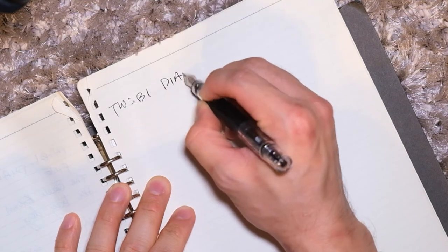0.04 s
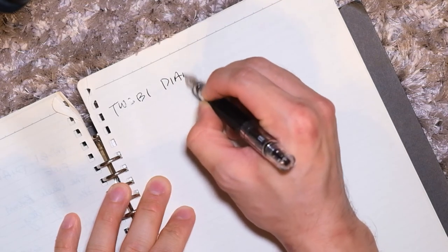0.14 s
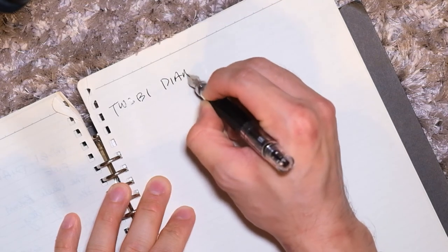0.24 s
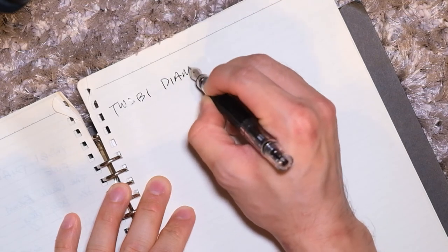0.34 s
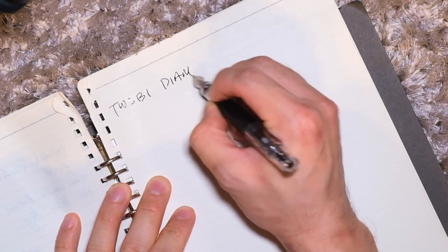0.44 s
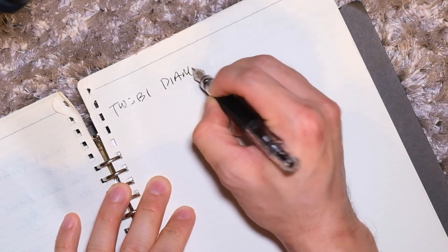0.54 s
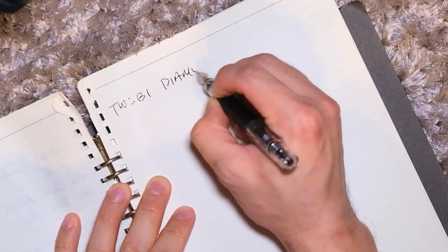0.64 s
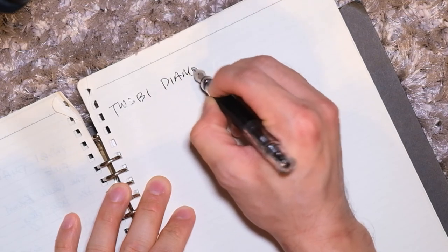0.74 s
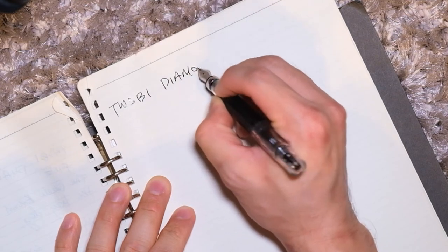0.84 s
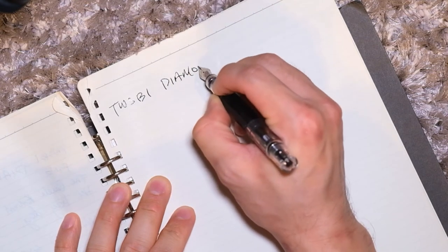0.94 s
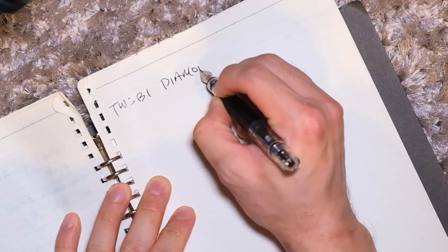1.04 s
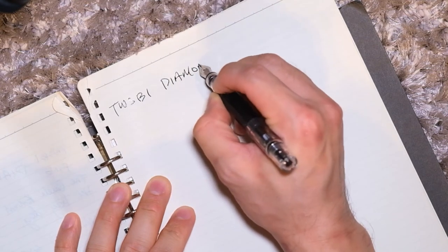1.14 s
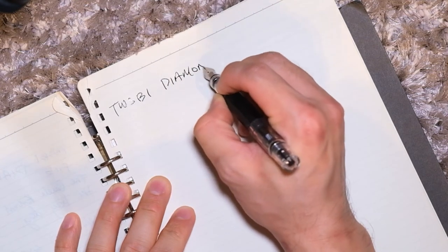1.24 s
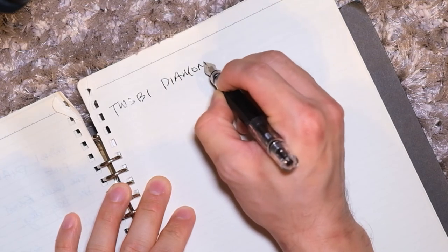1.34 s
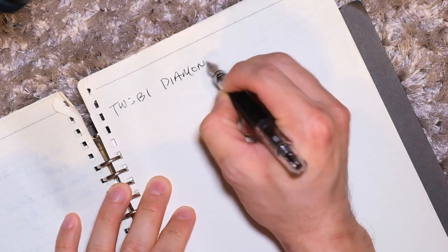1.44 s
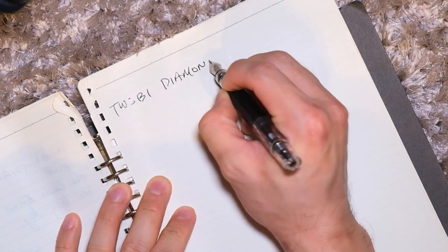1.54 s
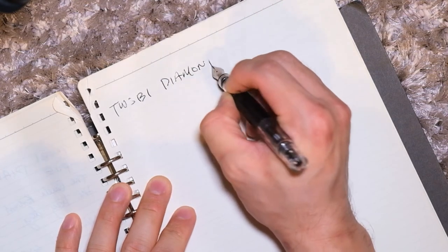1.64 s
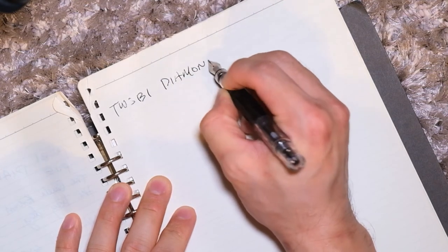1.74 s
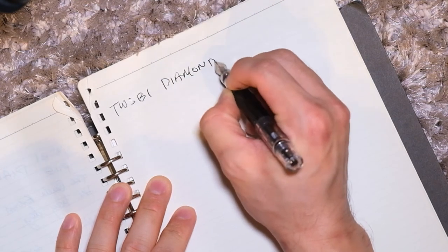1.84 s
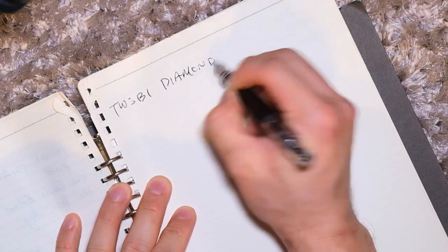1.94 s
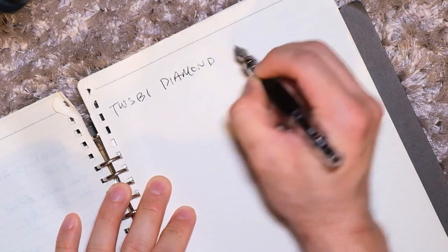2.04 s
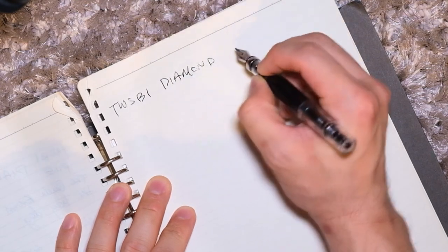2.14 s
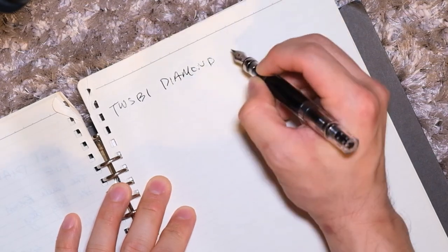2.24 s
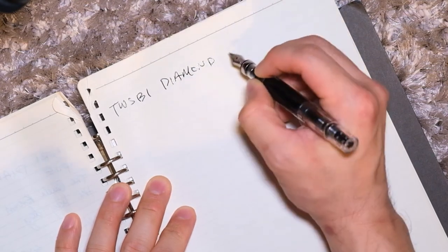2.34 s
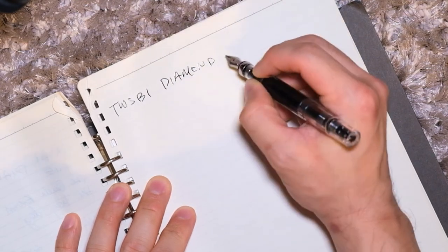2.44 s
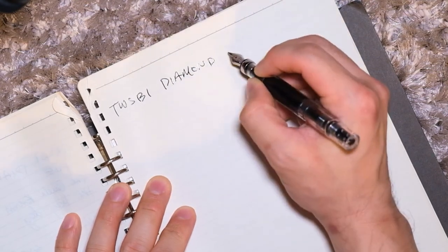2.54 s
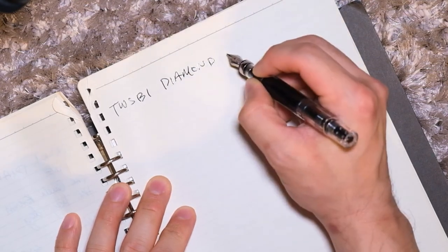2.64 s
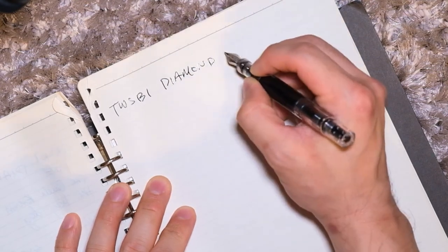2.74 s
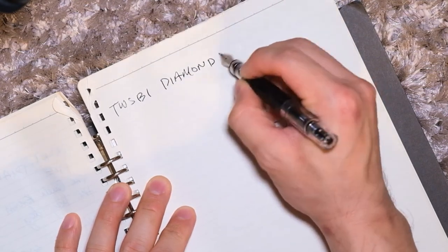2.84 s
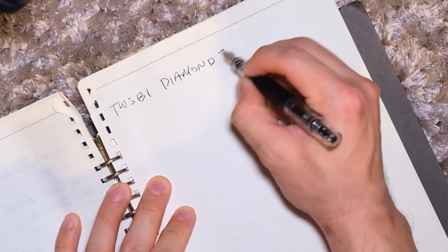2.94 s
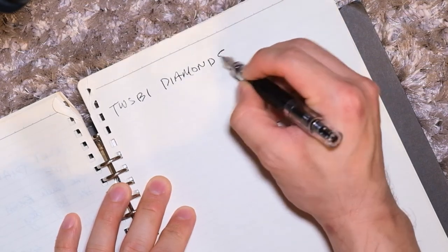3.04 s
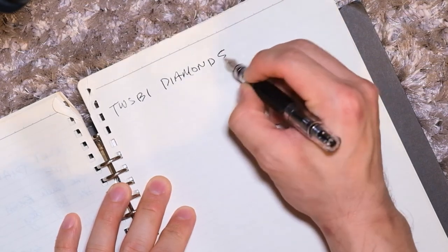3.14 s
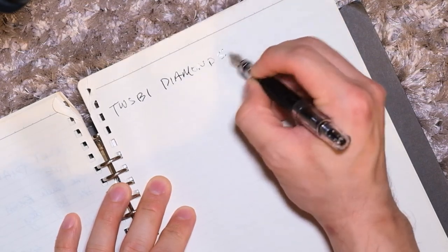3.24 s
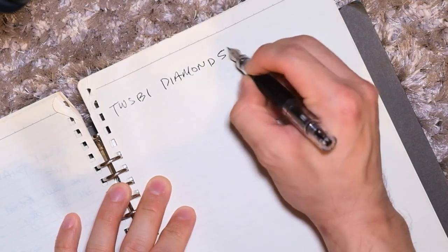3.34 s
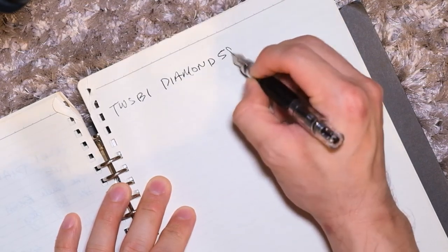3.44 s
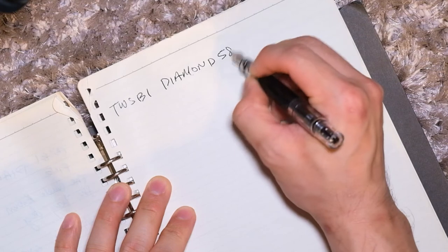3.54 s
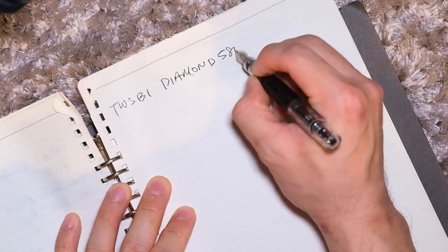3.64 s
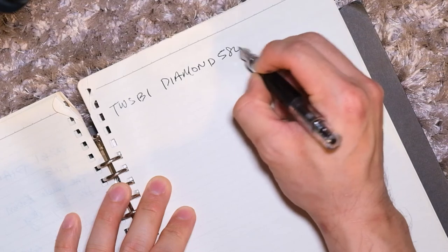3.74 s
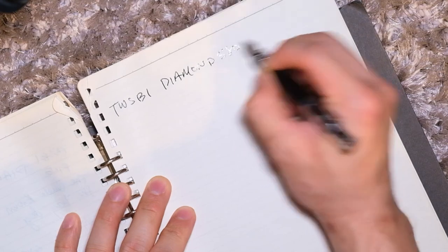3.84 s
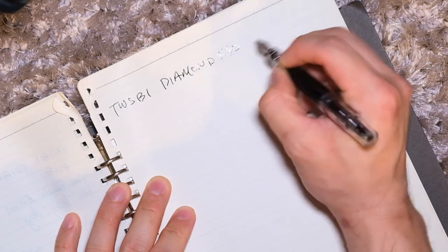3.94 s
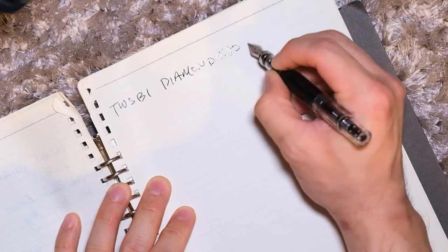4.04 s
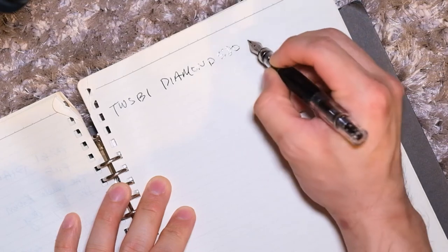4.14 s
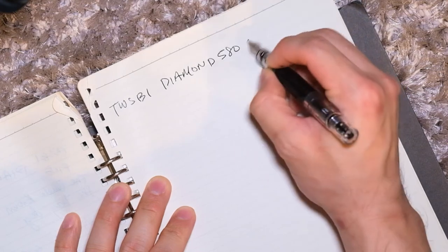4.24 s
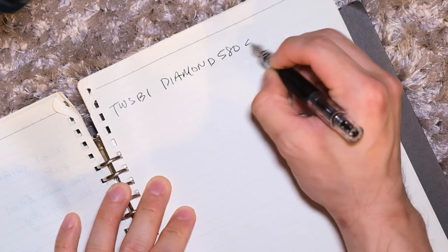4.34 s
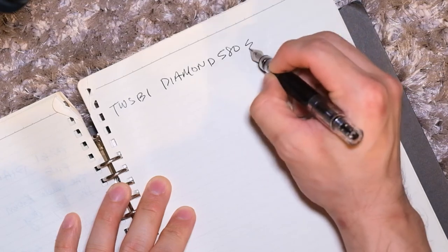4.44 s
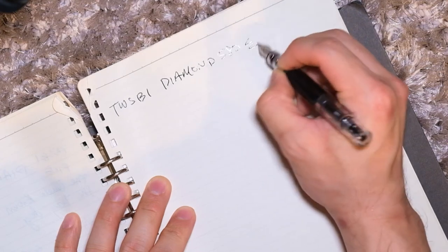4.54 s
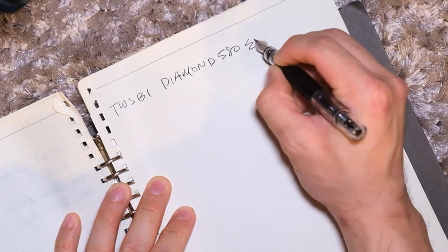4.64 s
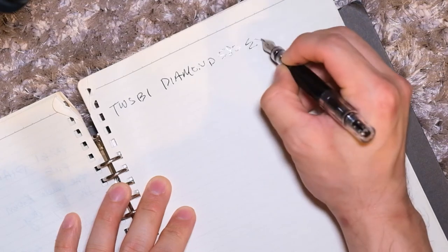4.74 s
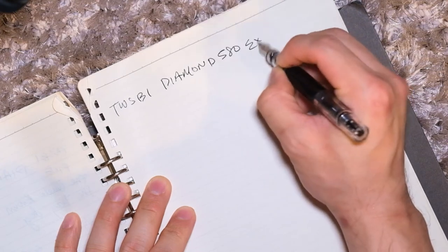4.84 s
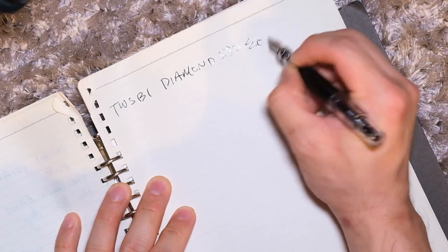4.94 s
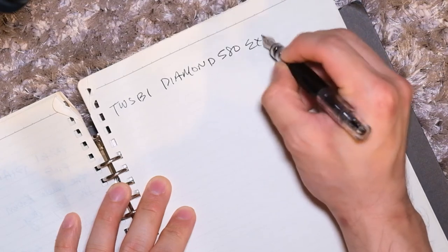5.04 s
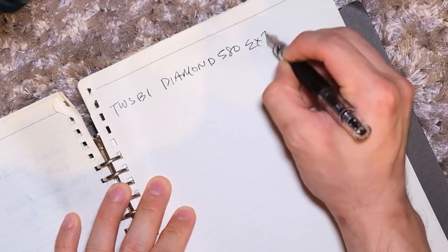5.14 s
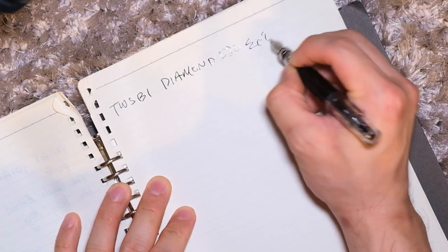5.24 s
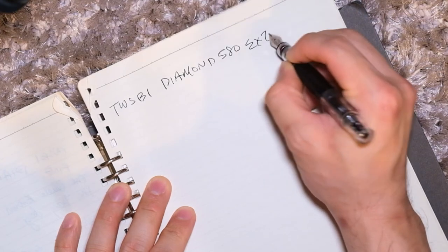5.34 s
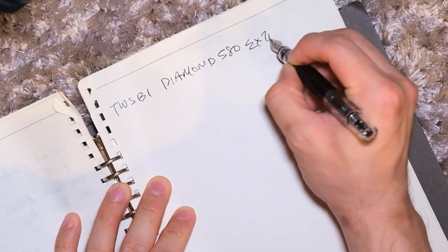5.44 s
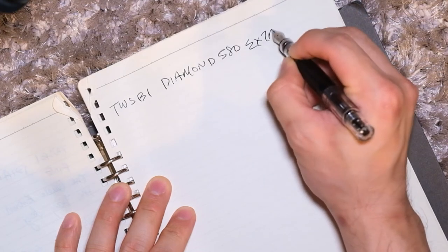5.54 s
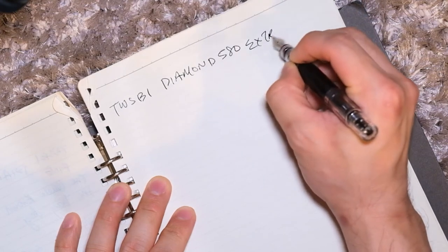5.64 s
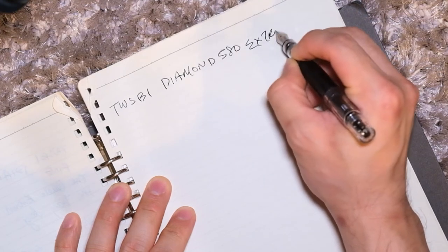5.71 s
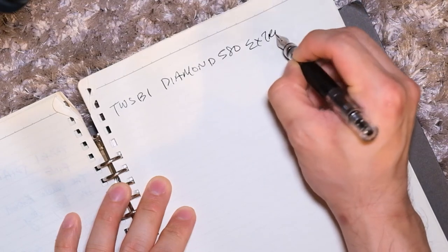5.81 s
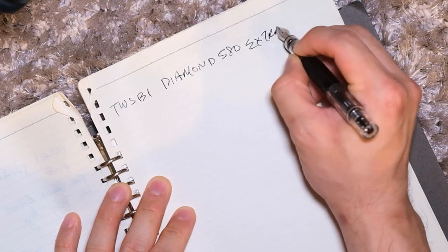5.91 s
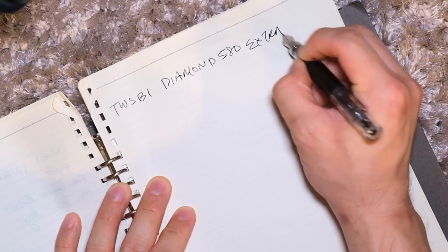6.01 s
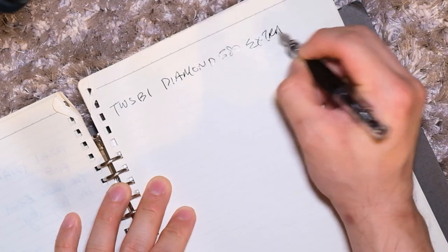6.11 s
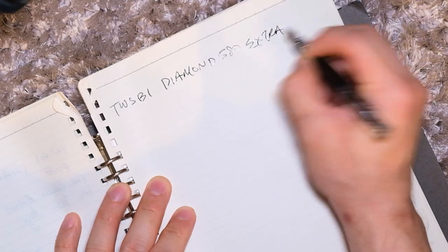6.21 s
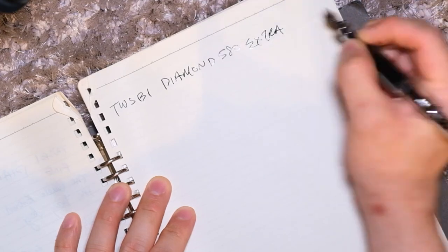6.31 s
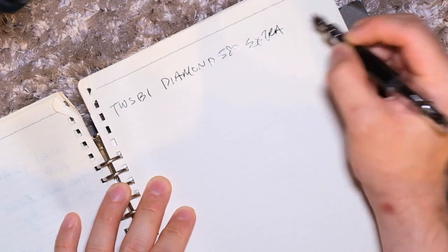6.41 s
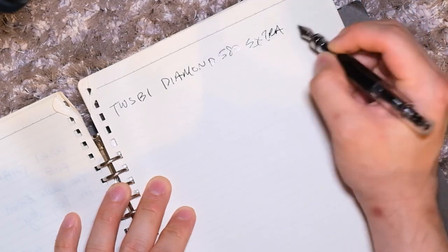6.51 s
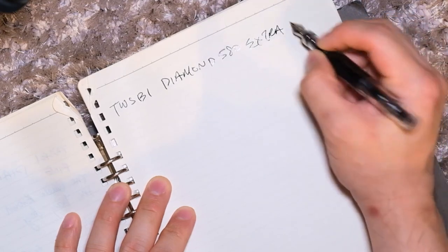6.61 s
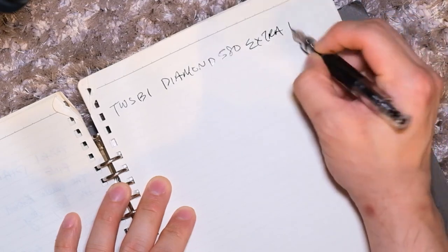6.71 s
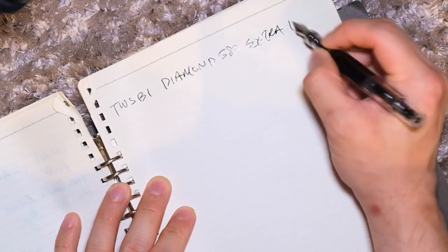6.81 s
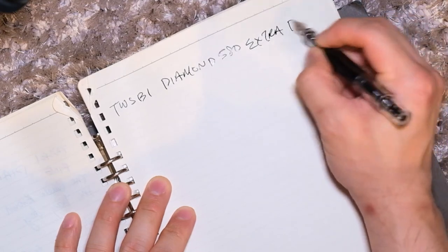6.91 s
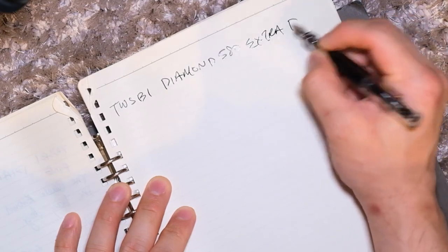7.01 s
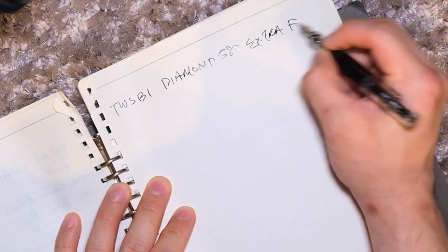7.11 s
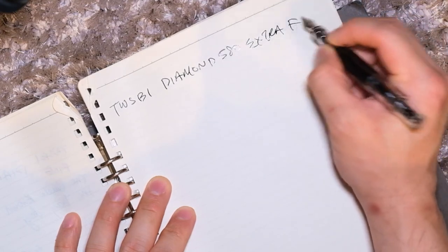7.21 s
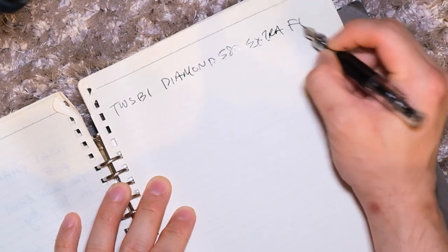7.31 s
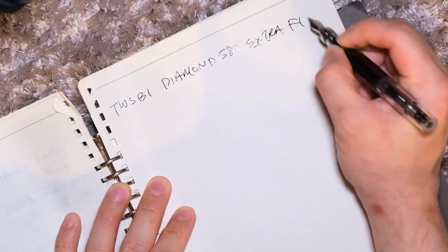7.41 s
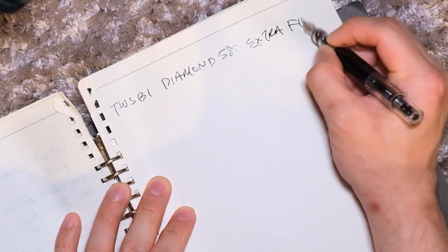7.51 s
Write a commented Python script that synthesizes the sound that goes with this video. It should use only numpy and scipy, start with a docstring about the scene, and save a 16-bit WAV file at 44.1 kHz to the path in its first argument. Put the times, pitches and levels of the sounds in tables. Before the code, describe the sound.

Close-up fountain pen writing: a quick run of scratchy strokes, a pause of almost a second with small clicks, then denser scribbling and more gaps. Near the end the hand slides softly, settles with two soft ticks, and slower strokes follow with firmer, woody pad thumps. Little room echo, a barely audible motor hum and low rumble underneath.

```python
"""Quiet room, ring notebook on a carpet: a fountain pen prints capital letters.
The steel nib ticks down, rasps over the paper's tooth and rings faintly: friction noise through filters and resonators.
The pad knocks where the pen presses or stops (decaying modes); the plastic pen clicks now and then (filtered impulses).
The hand slides along the page between words (shaped noise) and settles with two soft ticks (filtered impulses).
Low rumble, thin hiss and a distant motor's hum lie behind."""
import sys
import numpy as np
from scipy import signal
from scipy.fft import rfft, irfft, next_fast_len
from scipy.io import wavfile

SR = 44100
rng = np.random.default_rng(int(sys.argv[2]) if len(sys.argv) > 2 else 0)


def dump_mix(stems):
    """Bounce the given channels to the path in sys.argv[1] as a 16-bit WAV at rate SR."""
    frames = np.atleast_2d(stems).T  # one column per channel
    limited = np.clip(frames, -1, 1)  # hard clip at full scale
    pcm = np.round(limited * 32767).astype(np.int16)
    wavfile.write(sys.argv[1], SR, pcm)


N = 333837
TIME_S = np.arange(N) / SR

# Levels in event tables are relative: the mix offsets in scene() are added to them.
# pen strokes: start_s, end_s, top_speed_place [0-1], scratch_db, page_db
STROKES = [(0.006, 0.073, 0.39, -48, -41), (0.097, 0.159, 0.42, -45, -44.5),
           (0.162, 0.249, 0.33, -47.5, -44.5), (0.247, 0.327, 0.49, -43.5, -37.5),
           (0.335, 0.443, 0.23, -46, -39.5), (0.55, 0.649, 0.6, -46.5, -40.5),
           (0.642, 0.729, 0.24, -45.5, -40), (0.907, 1.001, 0.42, -51, -46), (1.025, 1.099, 0.65, -47, -40),
           (1.128, 1.265, 0.36, -51, -45.5), (1.25, 1.331, 0.48, -47.5, -42.5),
           (1.49, 1.626, 0.65, -50, -47.5), (1.717, 1.916, 0.43, -49.5, -43.5),
           (1.931, 1.984, 0.44, -57.5, -62), (2.812, 2.888, 0.47, -47.5, -41.5),
           (2.889, 3.014, 0.21, -48.5, -46), (2.994, 3.084, 0.47, -46, -39),
           (3.088, 3.154, 0.22, -48.5, -44.5), (3.251, 3.344, 0.73, -47, -43.5),
           (3.329, 3.495, 0.59, -49, -45.5), (3.477, 3.585, 0.17, -47.5, -42.5),
           (3.582, 3.665, 0.26, -48.5, -44.5), (3.649, 3.704, 0.22, -48.5, -42),
           (3.688, 3.783, 0.47, -45, -39), (3.791, 3.841, 0.6, -53.5, -58),
           (4.21, 4.285, 0.16, -46.5, -41.5), (4.283, 4.357, 0.45, -47.5, -43.5),
           (4.348, 4.442, 0.41, -48.5, -44.5), (4.438, 4.521, 0.31, -49, -42.5),
           (4.628, 4.709, 0.35, -48.5, -43.5), (4.779, 4.899, 0.4, -49, -44),
           (4.991, 5.095, 0.45, -52, -45.5), (5.096, 5.236, 0.27, -48, -42.5),
           (5.299, 5.404, 0.71, -52, -45.5), (5.428, 5.515, 0.5, -48.5, -44),
           (5.515, 5.611, 0.5, -48.5, -43), (5.599, 5.717, 0.31, -49, -42), (5.722, 5.799, 0.5, -50, -45),
           (5.822, 5.903, 0.39, -46.5, -41.5), (5.905, 6.035, 0.42, -47.5, -47),
           (6.143, 6.217, 0.1, -49, -43.5), (6.634, 6.743, 0.3, -47, -43.5),
           (6.846, 6.934, 0.7, -45.5, -39.5), (7.037, 7.126, 0.33, -43.5, -39.5),
           (7.222, 7.338, 0.25, -48.5, -45), (7.454, 7.546, 0.69, -49.5, -47)]
# nib lands on the paper: start_s, level_db
LANDINGS = [(0.5152, -27.5), (0.8517, -26.5), (1.3808, -33), (1.471, -28.5), (1.6927, -29), (2.775, -23),
            (3.259, -35), (4.019, -36), (4.1423, -30), (4.582, -30.5), (4.7717, -35), (4.996, -25),
            (5.2982, -28.5), (6.0968, -30), (6.6041, -28.5), (6.8245, -30), (7.004, -32.5), (7.204, -31),
            (7.447, -28.5)]
# pad of pages pressed or released: start_s, level_db, pitch_hz
KNOCKS = [(0.099, -32.5, 760), (0.344, -27.5, 670), (0.409, -29, 320), (0.437, -40, 109), (0.527, -26, 355),
          (0.629, -32, 450), (0.867, -25, 284), (1.389, -35.5, 253), (1.621, -31.5, 660), (1.861, -29, 580),
          (1.909, -33.5, 131), (1.957, -29, 500), (3.823, -25, 500), (3.959, -30.5, 382), (4.17, -26, 303),
          (4.511, -29, 393), (4.6042, -20.5, 393), (4.706, -32, 305), (4.796, -20.5, 367), (4.81, -27, 504),
          (4.87, -26.5, 322), (4.997, -31, 455), (5.02, -21.5, 365), (5.216, -29, 221), (5.311, -30, 212),
          (5.643, -28, 320), (5.98, -22, 316), (6.028, -33, 438), (6.122, -25, 185), (6.648, -23.5, 676),
          (6.726, -20, 466), (6.86, -31, 223), (6.923, -21.5, 465), (7.054, -22, 506), (7.0944, -18.5, 487),
          (7.2499, -23, 470), (7.2995, -18.5, 534)]
# clicks of the plastic pen, and two soft ticks as the hand settles (6.436 and 6.447 s):
# start_s, level_db, tilt_db_per_octave
CLICKS_AND_TICKS = [(0.4044, -24.5, 2), (0.7405, -29.5, 1), (1.3865, -21.5, 0.5), (1.624, -28, -5),
                    (1.929, -21.5, 0), (1.9554, -26, 8), (3.7915, -25.5, -2), (3.8212, -21.5, 7),
                    (4.528, -36.5, 2), (4.8715, -25.5, -0.5), (5.1858, -24, -1), (6.117, -25.5, -8),
                    (6.266, -30.5, 7), (6.4362, -30, -5.5), (6.4466, -28, -1.5), (6.6469, -39, -1),
                    (7.299, -27, 0)]
# hand slides over the page: start_s, end_s, level_db at top speed
SLIDES = [(1.96, 2.014, -57), (2.095, 2.503, -62), (3.12, 3.224, -58), (3.876, 4.014, -62),
          (6.17, 6.386, -52), (6.407, 6.48, -56)]
# nib's voice as the grip changes, levels re scratch:
# time_s, low_ring_hz, low_ring_db, high_ring_db, hiss_db, bite_db
GRIP = [(0.03, 8300, -12, -28, -9, 0.5), (0.29, 8430, -4.5, -26, -2.5, 2), (0.55, 8300, -24, -20, -6, -1.5),
        (1.07, 8200, -15, -25, -8.5, 5), (1.8, 8300, -19, -12, -6.5, -4),
        (2.85, 8700, -22, -1.5, -2.5, -4.5), (3.7, 7500, -22, -16, -4, -1), (4.35, 8900, -24, -4, -3, -0.5),
        (4.85, 8800, -22, -11, -4.5, -2.5), (5.04, 9000, -12, -8, -7.5, 1.5),
        (5.55, 8850, -7, -9, -8.5, 2.5), (5.85, 9000, -15, -18, -7.5, 2.5),
        (6.9, 7100, -15, -27, -4.5, -5.5), (7.45, 7000, -24, -17, -7.5, 3)]
# looser page towards its edge, thud under a landing: time_s, level_db re landing
LOOSENESS = [(0.5, -15), (5, -16), (6.1, -3), (7.5, -4)]
# page's answer to friction: freq_hz, level_db
PAGE_COLOUR = [(60, -49), (150, -9), (260, -12.5), (340, 0.5), (440, -3.5), (700, 0.5), (900, 0.5),
               (1020, 0), (1160, 0.5), (1400, -11), (1800, -64), (4000, -56.5)]
# rasp of the pen: freq_hz, level_db
RASP_COLOUR = [(900, -23.5), (1400, 7), (1750, 2), (2250, 4.5), (2750, -1.5), (3350, 2.45), (4400, -0.5),
               (5100, 0.5), (5600, -7.5), (6600, -9.5), (7500, -42), (10000, -34)]
# hiss of the nib: freq_hz, level_db
NIB_HISS_COLOUR = [(5000, -26.5), (7200, 3), (8300, 1), (9500, 2.5), (11000, 2), (12000, -1), (12700, -3),
                   (13700, -7), (14600, -6), (16000, -31.5)]
# steel tip meeting paper: freq_hz, level_db
TICK_COLOUR = [(300, -8), (1250, -3), (1700, -8), (2400, -8), (3300, 2), (5100, -4), (5900, -10),
               (8000, -7), (11200, -2), (13500, -7), (16000, -14)]
# pen clicks and hand ticks before their tilt: freq_hz, level_db
CLICK_COLOUR = [(500, -0.5), (1300, -6.5), (2000, 1), (2700, -7.5), (3800, -3.5), (6200, -7.5), (7500, -17),
                (11000, -16), (16000, -30)]
# top sheet pushed suddenly: freq_hz, level_db
CRACKLE_COLOUR = [(300, -9), (800, -3.5), (1300, -1.5), (2200, -10.5), (4000, -11), (8000, -20),
                  (16000, -37)]
# modes of the pad of pages: freq_hz, level_db, t60_s
PAD_MODES = [(95.5, -6, 0.1), (136.5, -2.5, 0.034), (203.4, -1.5, 0.027), (314, -5, 0.032),
             (373, -4.5, 0.033), (505, 6, 0.011), (658, 6, 0.012), (770, 0.5, 0.01), (950, -10, 0.03),
             (1180, 1, 0.022)]
# skin on paper: freq_hz, level_db
SKIN_COLOUR = [(200, 9), (600, -1), (1500, -1), (4500, 0.5), (7000, -4.5), (11000, 0), (16000, -15)]
# stereo width of the pen: freq_hz, side_minus_mid_db
PEN_WIDTH = [(100, -5.5), (300, -9.5), (700, -15), (2000, -24), (4500, -44), (6000, -21), (7000, -4),
             (8200, -8), (10000, -19), (13000, -10)]
# stereo balance of the pen: freq_hz, left_minus_right_db
PEN_BALANCE = [(150, -5), (350, -7.5), (700, -1.5), (1400, -3), (3000, -4.3), (5500, -3.4), (9000, -4),
               (13000, -4)]
# pen's place in the image, on top of the balance: time_s, left_minus_right_db
PEN_PLACE = [(0, 1.5), (1.8, 4), (3, 2.9), (5, 4.5), (7.5, 6.5)]
# what the room gives back: freq_hz, level_db
ROOM_COLOUR = [(300, 2), (1200, 0), (2500, -6), (5000, -2.5), (12000, 1)]
# room rumble and hiss: freq_hz, level_db
FLOOR_COLOUR = [(13, -35), (22, -2.5), (118, -2), (278, -9.5), (496, -16), (690, -19), (988, -21.5),
                (1170, -21), (1380, -19.5), (1490, -22.5), (2450, -27.5), (5770, -32.5), (6270, -33.5),
                (11500, -36), (16000, -39)]
# stereo width of the floor: freq_hz, side_minus_mid_db
FLOOR_WIDTH = [(30, -15), (150, -2), (500, -2), (2000, -4), (12000, -1.5)]
# partials of the distant motor: multiple_of_speed, level_db
HUM = [(1, -64), (2, -66), (3, -69), (4, -66)]

# short skid after landing; levels re landing
SKID_S, SKID_TOP, SKID_DB, SKID_PAGE_DB = 0.066, 0.067, -32, -29.5
HIGH_RING_HZ, HIGH_RING_WIDTH_HZ = 10620, 720  # upper nib mode stays in place
# pad springs back, weaker and softer: delay in knock cycles, level, share of pitch
REBOUND_CYCLES, REBOUND_DB, REBOUND_PITCH = 1.29, -9, 0.76
SLIDE_TOP = 0.39  # share of a slide at which the hand is fastest
ROOM_T60_S, ROOM_DB = 0.58, -19.5
FLOOR_DB = -52
MOTOR_HZ = 48.57
CUTOFF_HZ = 16000


def writing(ring_width_hz, page_db, rasp_db, hiss_db, ring_db, speed_power,
            page_lumps_db, bite_hz, bite_spread_db, catch_db):
    """One friction force drives page, pen and nib; the nib's low ring shifts with the grip."""
    force = friction(tooth_db=1.43, fibres_per_s=350, fibre_db=-8.0)
    force = force + from_db(catch_db) * catches(per_s=45, size_db=2.5)
    force = turning(force, depth_db=-5, changes_per_s=25)
    page = rms_one(colour(force, PAGE_COLOUR))
    page = page * from_db(page_lumps_db * drift(80))  # sheet lies unevenly on the pad
    rasp = rms_one(colour(force, RASP_COLOUR))
    hiss = rms_one(colour(force, NIB_HISS_COLOUR))
    # a nib that digs in drives the barrel harder
    bite = signal.lfilter(*signal.iirpeak(bite_hz, 2, fs=SR), rasp)

    skids = [(s, s + SKID_S, SKID_TOP, db + SKID_DB, db + SKID_PAGE_DB) for s, db in LANDINGS]
    moves = list(STROKES) + skids
    bite_chances = rng.standard_normal(len(moves))
    grip_s, *grip = np.transpose(GRIP)
    out = np.zeros(N)
    for (start_s, end_s, top, scratch_level_db, page_level_db), chance in zip(moves, bite_chances):
        span, speed = glide(start_s, end_s, top)
        middle_s = (start_s + end_s) / 2
        low_hz, low_db, high_db, grip_hiss_db, bite_db = (np.interp(middle_s, grip_s, c) for c in grip)
        bite_gain = from_db(bite_db + bite_spread_db * chance) - 1
        scratch = from_db(rasp_db) * rms_one(rasp[span] + bite_gain * bite[span])
        scratch += from_db(grip_hiss_db + hiss_db) * rms_one(hiss[span])
        scratch += from_db(low_db + ring_db) * resonate(force[span], low_hz, ring_width_hz)
        scratch += from_db(high_db + ring_db) * resonate(force[span], HIGH_RING_HZ, HIGH_RING_WIDTH_HZ)
        sound = from_db(scratch_level_db) * rms_one(scratch)
        sound += from_db(page_level_db + page_db) * rms_one(page[span])
        add(out, start_s, sound * rms_one(speed ** speed_power))
    return out


def friction(tooth_db, fibres_per_s, fibre_db):
    """Fine drag, uneven with the paper's tooth, and single fibres that snap past the tip."""
    drag = rms_one(rng.standard_normal(N) * from_db(tooth_db * drift(700)))
    snaps = rng.random(N) < fibres_per_s / SR
    fibres = snaps * rng.choice([-1, 1], N) * rng.uniform(0.26, 1, N)
    return rms_one(drag + from_db(fibre_db) * rms_one(fibres))


def catches(per_s, size_db):
    """Now and then the tip hooks a coarse fibre and jerks free: sparse impulses."""
    sizes = from_db(size_db * np.minimum(rng.exponential(1, N), 3)) * rng.choice([-1, 1], N)
    return rms_one(sizes * (rng.random(N) < per_s / SR))


def turning(x, depth_db, changes_per_s):
    """As the nib turns, short vibration paths come and go: faint treble peaks and gaps shift."""
    paths = sum(drift(changes_per_s) * echoes(x, t60_s=.012, size=1024) for _ in range(10))
    paths = signal.sosfilt(signal.butter(1, 2000, "high", fs=SR, output="sos"), paths)
    return x + from_db(depth_db) * rms_one(paths)


def glide(start_s, end_s, top):
    """A movement speeds up from rest and slows to rest: its samples and its speed."""
    span = slice(max(int(start_s * SR), 0), int(end_s * SR))
    top_s = start_s + np.clip(top, .05, .95) * (end_s - start_s)
    phase = np.interp(TIME_S[span], [start_s, top_s, end_s], [0, .5, 1])
    return span, np.abs(np.sin(np.pi * phase))


def resonate(x, hz, width_hz):
    """One resonance, at unit rms."""
    return rms_one(signal.lfilter(*signal.iirpeak(hz, hz / width_hz, fs=SR), x))


def contacts(tick_db, knock_db, click_db, thud_hz):
    """Nib landings, knocks of the pad, clicks of the pen and soft ticks of the settling hand."""
    out = np.zeros(N)
    for s, db in LANDINGS:
        tick = snap(TICK_COLOUR, rattle_db=-15, rattle_t60_s=.004)
        add(out, s, at_peak(tick, db + tick_db))
        thud = knock(thud_hz, crackle_db=-5)
        add(out, s, at_peak(thud, db + np.interp(s, *np.transpose(LOOSENESS))))
    for s, db, pitch_hz in KNOCKS:
        add(out, s, at_peak(press(pitch_hz), db + knock_db))
    for s, db, tilt_db in CLICKS_AND_TICKS:
        spectrum = [(hz, level_db + tilt_db * np.log2(hz / 1000)) for hz, level_db in CLICK_COLOUR]
        click = snap(spectrum, rattle_db=-9.0, rattle_t60_s=0.015)
        add(out, s, at_peak(click, db + click_db))
    return out


def snap(spectrum, rattle_db, rattle_t60_s, size=2048):
    """An impulse and a brief rattle after it, coloured by the spectrum."""
    force = from_db(rattle_db - 60 * TIME_S[:size] / rattle_t60_s) * rng.standard_normal(size)
    force[0] = 1
    return colour(force, spectrum)


def press(pitch_hz):
    """A knock of the pad and its rebound against the nib."""
    sound = knock(pitch_hz, crackle_db=-11.5)
    rebound = knock(pitch_hz * REBOUND_PITCH, crackle_db=-5)
    add(sound, REBOUND_CYCLES / pitch_hz, from_db(REBOUND_DB) * rebound)
    return sound


def knock(pitch_hz, crackle_db, sag_hz=170, sag_db=-14):
    """The pad thuds and sags on its carpet; the more sudden the push, the more the sheet crackles."""
    thud = at_peak(pad(pitch_hz), 0) + at_peak(pad(sag_hz), sag_db)
    sound = signal.sosfilt(signal.butter(1, pitch_hz / 4, "high", fs=SR, output="sos"), thud)
    crackle = at_peak(snap(CRACKLE_COLOUR, rattle_db=-3, rattle_t60_s=0.057), crackle_db)
    add(sound, 0, crackle * pitch_hz / 500)  # crackle_db holds at 500 Hz
    return sound


def pad(pitch_hz, spread_octaves=0.83, size=4000):
    """A push rings the pages' modes; its suddenness decides which answer most."""
    hz, db, t60_s = np.transpose(PAD_MODES)[:, :, None]
    answer = np.exp(-.5 * (np.log2(hz / pitch_hz) / spread_octaves) ** 2)
    strength = from_db(db + rng.normal(0, 1.8, hz.shape)) * answer
    t = TIME_S[:size]
    swing = np.sin(2 * np.pi * hz * t + rng.uniform(-0.96, 0.85, hz.shape))
    onset = 1 - np.exp(-t * pitch_hz / .4)  # a soft push builds up slowly
    return np.sum(strength * swing * from_db(-60 * t / t60_s), axis=0) * onset


def hand(level_db):
    """Skin brushes softly over the page, louder the faster it moves."""
    level = np.zeros(N)
    for start_s, end_s, db in SLIDES:
        span, speed = glide(start_s, end_s, SLIDE_TOP)
        level[span] += from_db(db + level_db) * speed
    brush = rng.standard_normal(N) * from_db(0.9 * drift(200))
    return level * rms_one(colour(brush, SKIN_COLOUR))


def microphones(pen):
    """Level and close reflections from hand and page differ between the two sides."""
    side = colour(echoes(pen, t60_s=.025), PEN_WIDTH)
    balance = np.array(PEN_BALANCE)
    left = colour(pen + side, balance * [1, .5])
    right = colour(pen - side, balance * [1, -.5])
    place_db = np.interp(TIME_S, *np.transpose(PEN_PLACE))
    return np.array([left, right]) * from_db(place_db * [[.5], [-.5]])


def room_echo(pen):
    """Dense reflections of the room, independent on each side."""
    return colour(np.array([echoes(pen, ROOM_T60_S), echoes(pen, ROOM_T60_S)]), ROOM_COLOUR)


def room_floor(level_db):
    """Low rumble of the room and a thin hiss."""
    rumble = colour(rng.standard_normal((2, N)), FLOOR_COLOUR)
    highpass = signal.butter(2, 32, "high", fs=SR, output="sos")
    mid, side = rms_one(signal.sosfilt(highpass, rumble))
    return from_db(FLOOR_DB + level_db) * (mid + colour(side, FLOOR_WIDTH) * [[1], [-1]])


def motor(waver_db):
    """A distant motor: faint harmonic hum whose partials waver in level."""
    turns_rad = 2 * np.pi * MOTOR_HZ * TIME_S
    hum = np.zeros(N)
    for multiple, db in HUM:
        level = np.sqrt(2) * from_db(db + waver_db * drift(8.7))
        hum += level * np.sin(round(multiple) * turns_rad + rng.uniform(0, 2 * np.pi))
    return hum


def from_db(db):
    """Decibels to gain."""
    return 10 ** (np.asarray(db) / 20)


def rms_one(x):
    """Scale to unit rms."""
    return x / np.sqrt(np.mean(x ** 2) + 1e-20)


def at_peak(sound, db):
    """Scale a sound to a peak level."""
    return from_db(db) * sound / np.max(np.abs(sound))


def add(track, s, sound):
    """Mix a short sound in at time s."""
    i = max(int(s * SR), 0)
    track[i:i + len(sound)] += sound[:max(len(track) - i, 0)]


def at_hz(points, size):
    """A table over log frequency, read at the bins of a transform."""
    hz, value = np.transpose(points)
    return np.interp(np.log(np.arange(size // 2 + 1) * SR / size + 1), np.log(hz), value)


def colour(x, spectrum):
    """Causal (minimum-phase) filter with the given spectrum, by folding its cepstrum."""
    size = 2 * next_fast_len(x.shape[-1] // 2 + 1024)
    cepstrum = irfft(np.log(from_db(at_hz(spectrum, size))))
    cepstrum[1:size // 2] *= 2
    cepstrum[size // 2 + 1:] = 0
    return irfft(rfft(x, size) * np.exp(rfft(cepstrum)))[..., :x.shape[-1]]


def drift(rate_hz):
    """Smooth chance at unit rms, heading for a new value rate_hz times a second."""
    steps = rng.standard_normal(N)
    return rms_one(np.interp(TIME_S * rate_hz, np.arange(N), steps))


def echoes(x, t60_s, size=16384):
    """Dense reflections of unit energy that build up fast and die away."""
    t = TIME_S[:size]
    tail = rng.standard_normal(size) * from_db(-60 * t / t60_s) * (1 - np.exp(-t * 50 / t60_s))
    return signal.oaconvolve(x, tail / np.linalg.norm(tail))[:N]


def scene():
    """Close pen and hand sounds and their room echo over a low rumble and hum."""
    pen = writing(ring_width_hz=180, page_db=-3.0, rasp_db=1.5, hiss_db=0.5, ring_db=0.5,
                  speed_power=1.02, page_lumps_db=2.0, bite_hz=2080, bite_spread_db=1.7, catch_db=-13.5)
    pen = pen + contacts(tick_db=0, knock_db=-1.5, click_db=-5.0, thud_hz=526)
    pen = pen + hand(level_db=-3.5)
    near = microphones(pen) + from_db(ROOM_DB) * room_echo(pen)
    return near + room_floor(level_db=-1.0) + motor(waver_db=3.5)


def record(dry):
    """Steep elliptic low-pass."""
    return signal.sosfilt(signal.ellip(10, .1, 70, CUTOFF_HZ, fs=SR, output="sos"), dry)


dry = scene()
out = record(dry)
dump_mix(out)
```